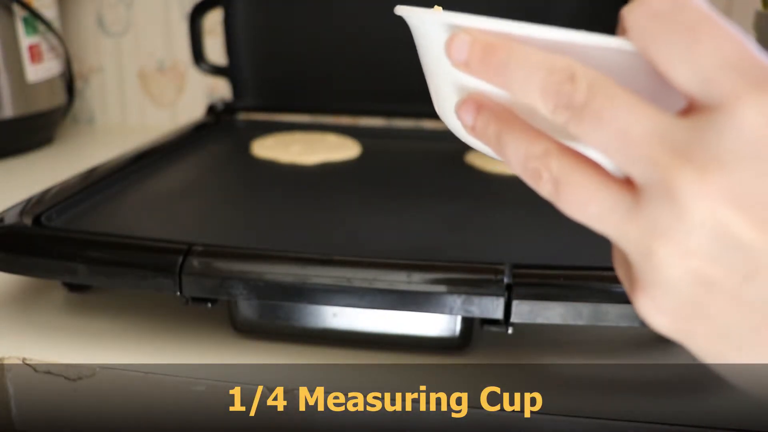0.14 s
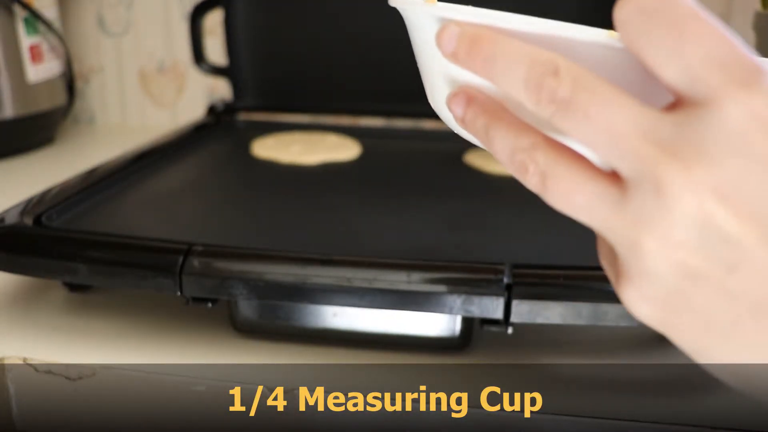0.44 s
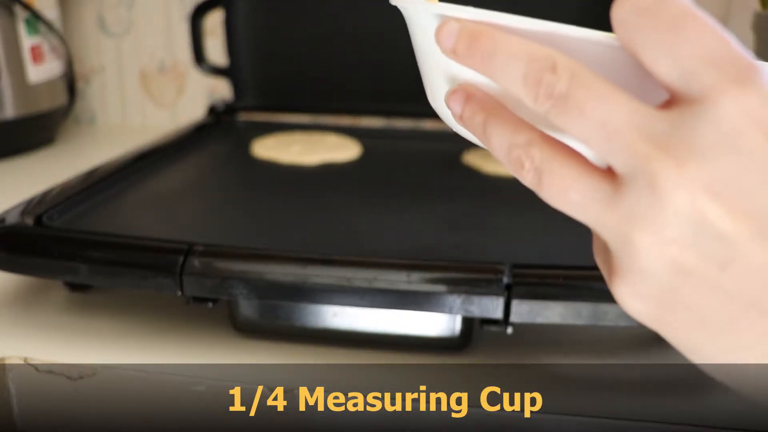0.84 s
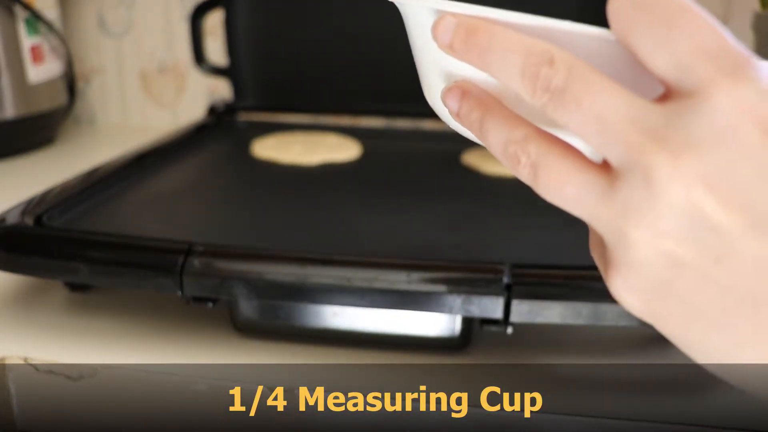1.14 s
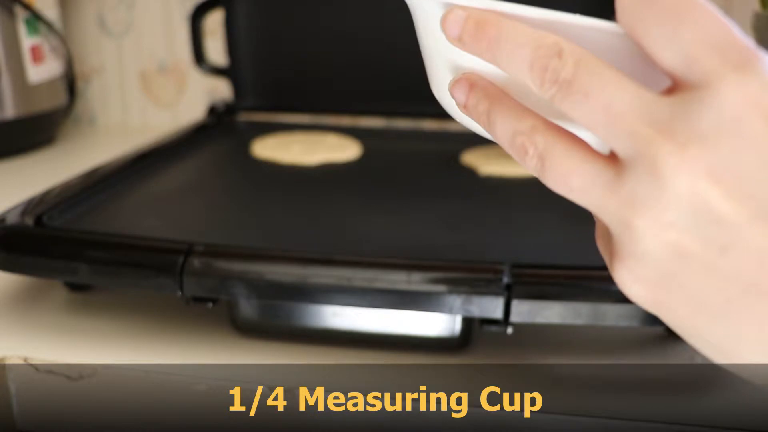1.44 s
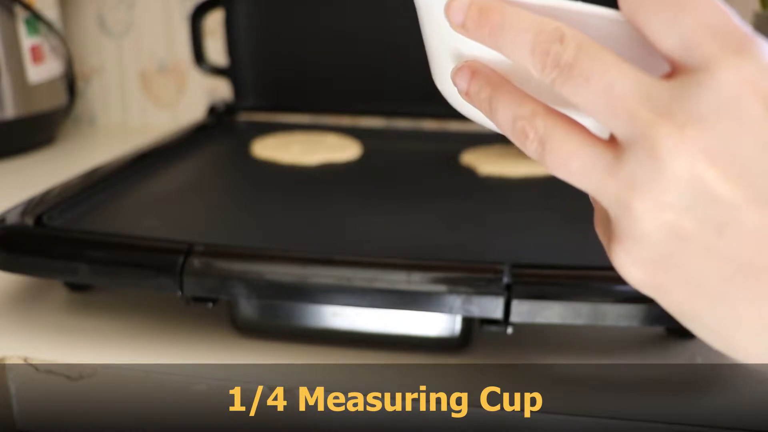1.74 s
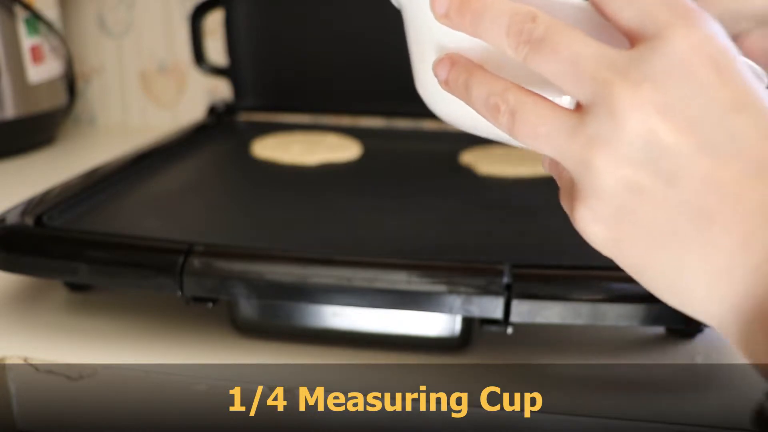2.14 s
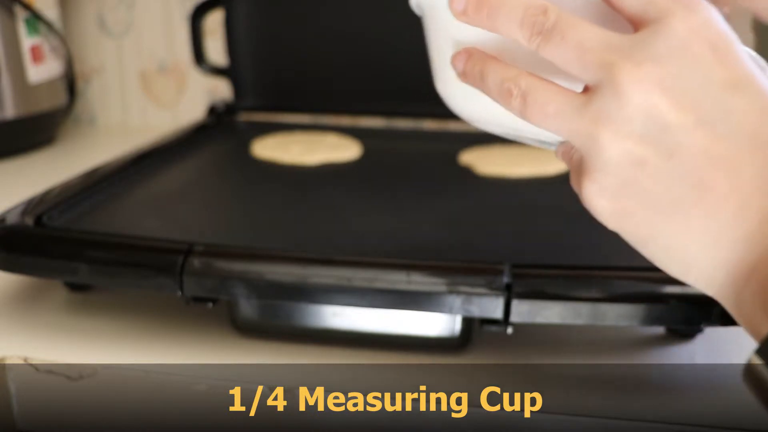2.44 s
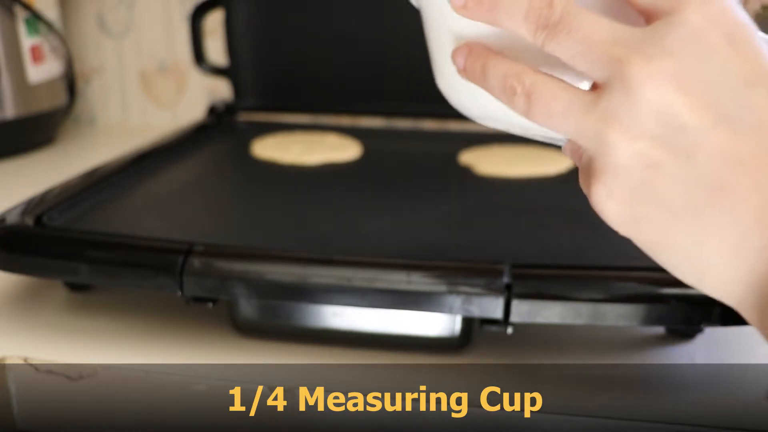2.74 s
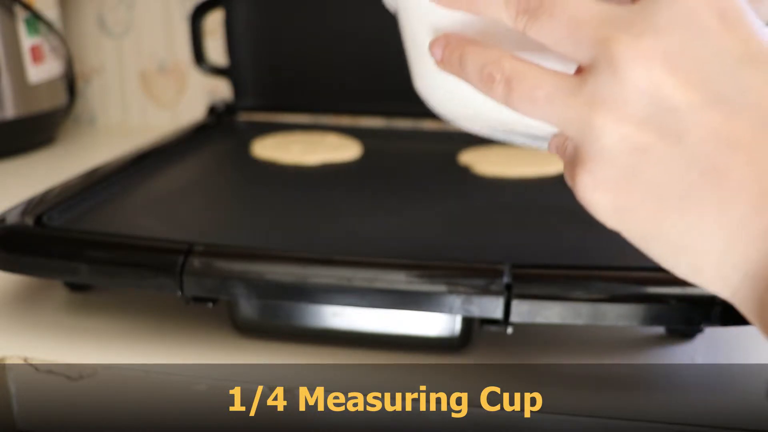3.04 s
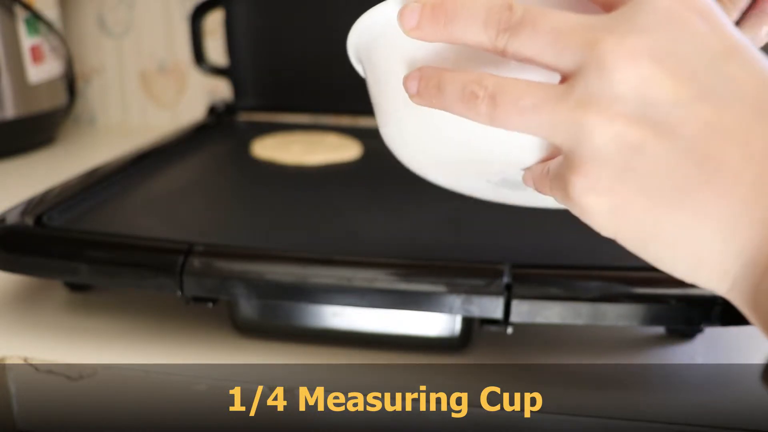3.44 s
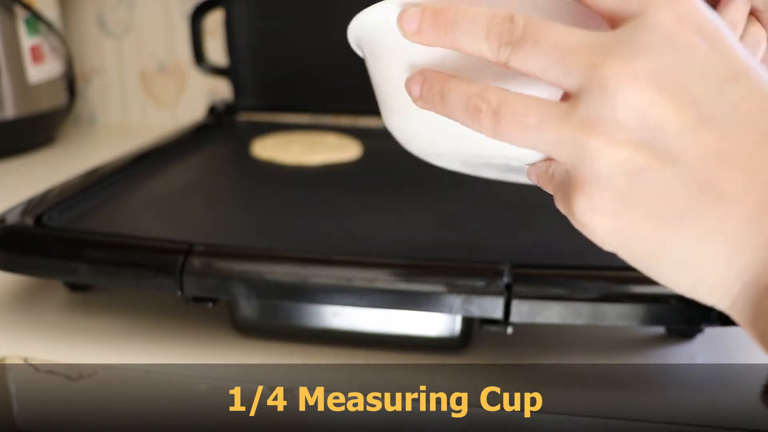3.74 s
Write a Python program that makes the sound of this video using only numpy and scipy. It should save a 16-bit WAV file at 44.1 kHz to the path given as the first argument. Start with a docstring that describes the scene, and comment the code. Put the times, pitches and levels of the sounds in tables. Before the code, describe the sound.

A soft, crackling sizzle of batter on a hot griddle, and a cup tapping twice.

```python
"""A quiet sizzle of pancake batter on an electric griddle: tiny steam bubbles burst in flurries, and a few
larger ones spit or pop. Late on, a measuring cup knocks twice, hollow and then bright, and a spoon scrapes
softly in the batter bowl. The kitchen's counter and walls answer with quick echoes and a short tail, over a low
rumble, mains hum and faint hiss."""
import sys
import numpy as np
from scipy import signal
from scipy.fft import rfft, irfft
from scipy.io import wavfile

SR = 44100
rng = np.random.default_rng(int(sys.argv[2]) if len(sys.argv) > 2 else 0)


def master_out(mix):
    """Clip the mix to full scale and print it as 16-bit PCM to the path in sys.argv[1]."""
    frames = np.transpose(np.atleast_2d(mix))
    ceiling = np.clip(frames, -1, 1)
    pcm = np.round(ceiling * 32767).astype(np.int16)
    wavfile.write(sys.argv[1], SR, pcm)


N = 171990  # 3.9 s


def undb(db):
    """Decibels to gain."""
    return 10 ** (np.asarray(db) / 20)


def unit(x):
    """Scale to rms 1."""
    return x / np.sqrt(np.mean(x ** 2))


def shape(x, gain):
    """Filter by a function of frequency."""
    hz = np.maximum(np.fft.rfftfreq(len(x), 1 / SR), 1)
    return irfft(rfft(x) * gain(hz), len(x))


def colour(x, points):
    """EQ through (frequency [Hz], gain [dB]) points."""
    hz, db = np.array(points).T
    return shape(x, lambda f: undb(np.interp(np.log(f), np.log(hz), db)))


def band(x, hz, width_hz):
    """One resonance, at rms 1."""
    peak = signal.iirpeak(min(hz, SR / 2 - 1), hz / width_hz, fs=SR)
    return unit(signal.lfilter(*peak, x))


def wobble(hz):
    """Smooth random modulation at rms 1, rolling off above hz."""
    return unit(shape(rng.standard_normal(N), lambda f: np.exp(-(f / hz) ** 2)))


def fade(t, t60):
    """Exponential decay, 60 dB down at t60."""
    return np.exp(-np.log(1000) * t / t60)


def clicks(per_s, spread_db):
    """Random clicks of unequal size."""
    hits = rng.random(N) < per_s / SR
    polarity = rng.choice([-1, 1], N)
    return hits * polarity * undb(spread_db * np.minimum(rng.exponential(size=N), 3.5))


def add(out, start, x):
    """Mix x in at start seconds."""
    i = int(start * SR)
    out[i:i + len(x)] += x[:N - i]


# dark room tone (frequency [Hz], gain [dB])
RUMBLE_COLOUR = [(12, -19), (22, -9), (40, -2.5), (65, 0.5), (90, -7), (125, -8.5), (170, -13),
                 (210, -11.5), (300, -16.5), (400, -18), (1000, -23.5), (2000, -27), (8000, -44)]
# microphone hiss (frequency [Hz], gain [dB])
HISS_COLOUR = [(50, 2), (150, 3), (500, 6.5), (2000, -4), (5000, -5), (9000, -6.5), (15000, 5.5)]

def background(t, hum_hz=60.2):
    """The bed: low rumble and mains hum in the centre, separate faint hiss on each side."""
    rumble = undb(-50) * unit(colour(rng.standard_normal(N), RUMBLE_COLOUR))
    hum = undb(-56.5) * unit(np.sin(2 * np.pi * hum_hz * t))
    hiss = np.array([unit(colour(noise, HISS_COLOUR)) for noise in rng.standard_normal((2, N))])
    return rumble + hum + undb(-60.5) * hiss


# early reflections off counter, lid and bowl (delay [s], level [dB])
ECHOES = [(.0062, -18), (.0085, -18), (0.011, -16)]
# tone of the walls' tail (frequency [Hz], gain [dB])
ROOM_COLOUR = [(150, -2), (320, -2), (550, 0), (1000, 0), (3000, 1.5), (6000, 0), (12000, -7)]

def kitchen_reverb(dry, t, tail_db=-14, predelay_s=0.012, build_s=0.015):
    """Near surfaces echo at once; the walls follow with a short diffuse tail."""
    t = t[:32768]
    build = np.clip((t - predelay_s) / build_s, 0, 1)
    tail = colour(rng.standard_normal(len(t)), ROOM_COLOUR) * fade(t, t60=0.34) * build
    response = undb(tail_db) * tail / np.sqrt(np.sum(tail ** 2))
    for delay, db in ECHOES:
        response[int(delay * SR)] += undb(db)
    return dry + signal.fftconvolve(dry, response)[:N]


# body of the bowl under a scrape (frequency [Hz], gain [dB])
BOWL_COLOUR = [(250, -3), (600, -12.5), (820, -6.5), (1150, -8.5), (1400, -12.5), (1750, -5), (2400, -14),
               (4000, -9), (6000, -38)]
# soft strokes of the spoon (time [s], length [s], level before trim [dB], pitch [Hz])
SCRAPES = [(3.196, 0.026, -44.5, 1600), (3.26, 0.011, -43.5, 1710), (3.263, 0.076, -40.5, 1010),
           (3.3, 0.013, -43, 1220), (3.407, 0.048, -45, 840), (3.425, 0.055, -53, 1470),
           (3.468, 0.058, -47, 1040)]

def spoon_scrapes(trim_db=-0.5):
    """The spoon drags through the bowl in short gritty strokes."""
    out = np.zeros(N)
    for start, length, db, hz in SCRAPES:
        grit = colour(clicks(per_s=900, spread_db=4)[:8192], BOWL_COLOUR)
        stroke = band(grit, hz, width_hz=450)[:int(length * SR)]
        swell = np.sqrt(2 * np.hanning(len(stroke)))
        add(out, start, undb(db + trim_db) * unit(stroke) * swell)
    return out


# ring of the hollow knock and of the bright one (frequency [Hz], level [dB], t60 [s])
HOLLOW_MODES = [(437, -13, 0.043), (562, 0.5, 0.014), (730, -14.5, 0.043), (1080, -11.5, 0.042),
                (1265, -4, 0.013), (1473, 4.5, 0.0069), (1580, -21, 0.025), (1730, -18, 0.043),
                (1955, -26, 0.06), (2430, -24, 0.039), (3340, -24.5, 0.052), (4000, -21, 0.029),
                (4710, -7, 0.0072), (7350, -18, 0.0055)]
BRIGHT_MODES = [(668, -11, 0.029), (730, -5, 0.016), (1138, -9.5, 0.04), (1240, -2.5, 0.011),
                (1490, -7, 0.018), (1846, -9.5, 0.025), (2340, -11.5, 0.023), (2465, -13.5, 0.022),
                (3230, -17, 0.019), (3490, -18.5, 0.04), (4970, -27, 0.024), (6950, -13.5, 0.008)]
# tone of each knock's crack (frequency [Hz], gain [dB])
HOLLOW_CRACK = [(120, 1), (300, -9), (450, 12), (900, 11), (2000, -9), (2700, -8), (4000, 4), (5000, -4),
                (5700, -8), (8300, -7), (15000, -25)]
BRIGHT_CRACK = [(150, -2), (330, -5), (600, 0), (900, 5), (1800, 15), (3500, 2), (4100, -10), (6000, -10),
                (7100, 2), (7800, -16), (9400, -8), (15000, -22)]
# the two hits (time [s], gain [dB], ring table, crack table)
KNOCKS = [(2.635, -0.5, HOLLOW_MODES, HOLLOW_CRACK), (2.9884, 0, BRIGHT_MODES, BRIGHT_CRACK)]

def cup_knocks(t, contact_s=0.00068, low_cut_hz=215):
    """Each blow is a short crack and a quickly damped ring; the small body radiates little bass."""
    out, t = np.zeros(N), t[:16384]
    attack = 1 - np.exp(-t / contact_s)
    for start, db, modes, crack_colour in KNOCKS:
        ring = sum(undb(level) * np.sin(2 * np.pi * hz * t) * fade(t, t60) for hz, level, t60 in modes)
        crack = undb(-12) * colour(rng.standard_normal(len(t)), crack_colour) * fade(t, t60=0.033)
        add(out, start, undb(db) * (ring + crack) * attack)
    return signal.sosfilt(signal.butter(2, low_cut_hz, "high", fs=SR, output="sos"), out)


# small pitched blips in the wet batter (time [s], peak level [dB], pitch [Hz])
POPS = [(.868, -45, 3400), (.863, -40, 6200), (2.548, -42, 3430)]

def batter_pops(t, length_s=0.01):
    """Air pockets in the batter open with a short soft blip."""
    out, t = np.zeros(N), t[:int(length_s * SR)]
    for start, db, hz in POPS:
        add(out, start, undb(db) * np.hanning(len(t)) * np.sin(2 * np.pi * hz * t))
    return out


# sharp accents above the sizzle (time [s], level before trim [dB], pitch [Hz])
SPITS = [(0.281, -32, 9000), (0.352, -27, 7500), (0.9323, -30, 9500), (.958, -26.5, 9050),
         (.988, -31, 9300), (1.0287, -29.5, 10900), (1.499, -30, 8500), (1.6134, -23, 9400),
         (2.005, -34, 8930), (2.026, -24.5, 9250), (2.0554, -27.5, 8300), (2.231, -23.5, 9100),
         (2.2887, -27, 6400), (2.565, -26, 8100), (2.5861, -27.5, 9200), (2.613, -24, 8900),
         (3.1427, -30.5, 6990), (3.1793, -23.5, 9200), (3.3887, -29.5, 10000), (3.866, -29.5, 9500)]

def batter_spits(t, trim_db=-6, snap_db=-3):
    """Larger bubbles snap open with a brief high ring."""
    out, t = np.zeros(N), t[:2048]
    for start, db, hz in SPITS:
        puff = rng.standard_normal(len(t))
        spit = band(puff, hz, width_hz=1400) + undb(snap_db) * puff
        add(out, start, undb(db + trim_db) * spit * fade(t, t60=0.009))
    return out


# fader ride of the sizzle (time [s], level before trim [dB])
SIZZLE_LEVEL = [(0, -42.5), (.35, -43.5), (.44, -45.5), (.65, -42), (1.0, -44.5), (1.15, -46.5),
                (1.38, -45.5), (1.5, -44), (2.24, -44), (2.44, -49.5), (2.61, -45.5), (2.8, -53),
                (3.08, -55.5), (3.14, -43.5), (3.28, -44.5), (3.47, -45.5), (3.56, -49), (3.9, -49)]

def sizzle_ride_db(t):
    """The sizzle's level drifts, and is ducked after each knock before coming back up."""
    return np.interp(t, *np.array(SIZZLE_LEVEL).T)


# bright edge of the crackles (frequency [Hz], gain [dB])
CRACKLE_COLOUR = [(800, -21), (2500, -6.5), (5000, -5), (7500, -2.5), (9200, 3.5), (11000, -1.5),
                  (12000, -5.5), (15000, -4.5), (16000, -3.5)]

def steam_crackles(t, level_db=-48, follow=0.54):
    """Sparser bubbles each let out a brief bright puff of steam, partly following the sizzle's ride."""
    bursts = clicks(per_s=110, spread_db=2)
    power_decay = fade(1 / SR, t60=0.015) ** 2  # per sample
    power = signal.lfilter([1], [1, -power_decay], bursts ** 2 + 1e-18)
    puffs = unit(colour(np.sqrt(power) * rng.standard_normal(N), CRACKLE_COLOUR))
    ride_db = sizzle_ride_db(t)
    return puffs * undb(level_db + follow * (ride_db - ride_db.max()))


# tone of the bursting bubbles (frequency [Hz], gain [dB])
SIZZLE_COLOUR = [(300, -14), (1200, -8.5), (1900, -6), (2600, -1), (3500, -3.5), (4800, 0.5), (6500, -2.5),
                 (8200, 0), (9300, -0.5), (10800, -1.5), (12000, -10), (15000, -9), (16000, -15.5)]

def batter_sizzle(t, trim_db=-2.13, flurry_hz=32.8, flicker_hz=171, split_hz=4970, wet_db_per_s=-0.14):
    """Thousands of tiny steam bursts, bunched in flurries, merge into a fizz."""
    bubbles = clicks(per_s=9000, spread_db=3)
    flurries = undb(1.46 * wobble(flurry_hz) + wobble(flicker_hz))
    fizz = unit(colour(bubbles * flurries, SIZZLE_COLOUR))
    wet = shape(fizz, lambda f: 1 / (1 + (f / split_hz) ** 4))
    crisp = (fizz - wet) * undb(1.47 * wobble(flurry_hz))  # the treble gets extra flurries
    setting = undb(wet_db_per_s * t)  # the wet mids ease off as the batter sets
    return (wet * setting + crisp) * undb(trim_db + sizzle_ride_db(t))


def scene():
    """Griddle and cup dead centre in the kitchen, over the bed."""
    t = np.arange(N) / SR
    griddle = batter_sizzle(t) + steam_crackles(t) + batter_spits(t) + batter_pops(t)
    cup = cup_knocks(t) + spoon_scrapes()
    return kitchen_reverb(griddle + cup, t) + background(t)


def record(dry, top_hz=15900):
    """Clip at full scale, then cut the top steeply."""
    high_cut = signal.ellip(10, .1, 80, top_hz, fs=SR, output="sos")
    return signal.sosfilt(high_cut, np.clip(dry, -1, 1))


dry = scene()
out = record(dry)
master_out(out)
```